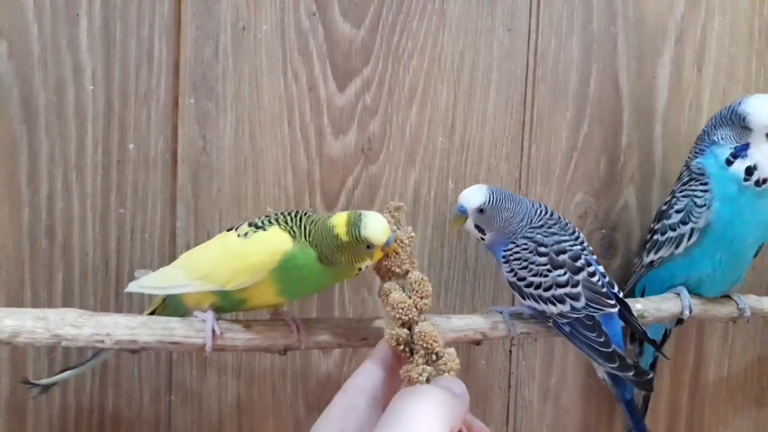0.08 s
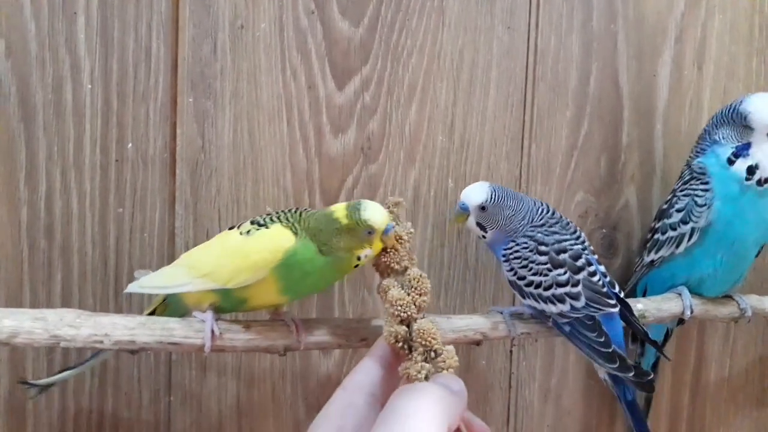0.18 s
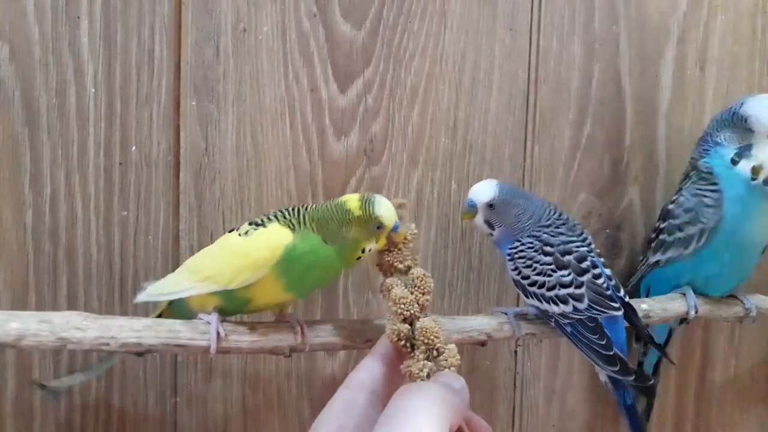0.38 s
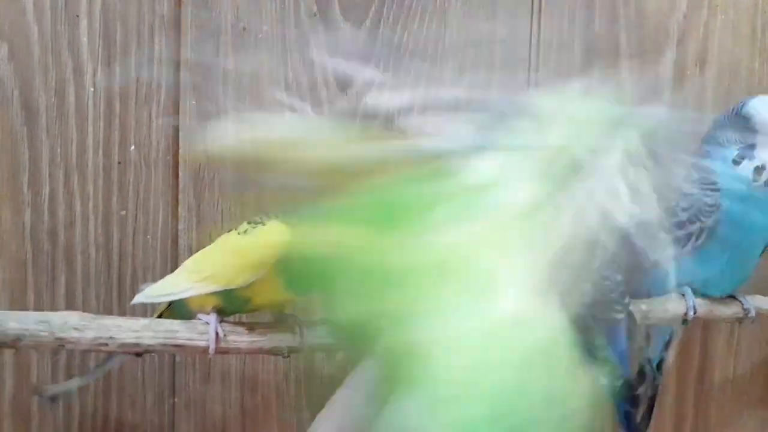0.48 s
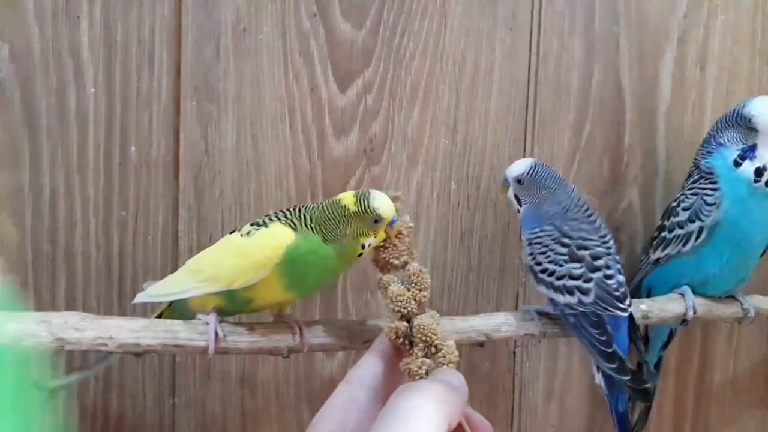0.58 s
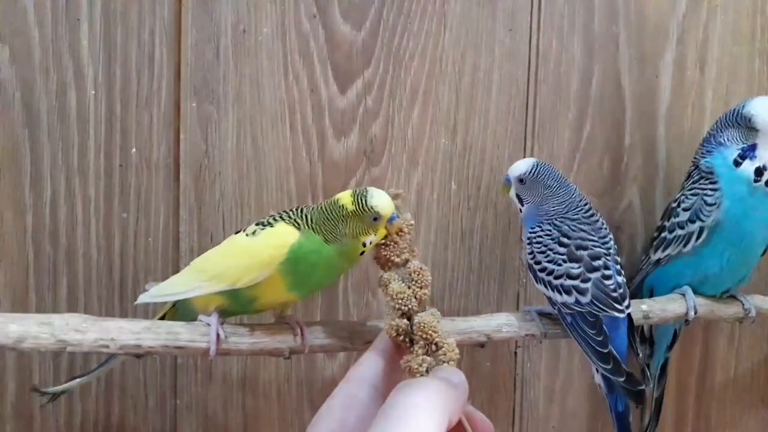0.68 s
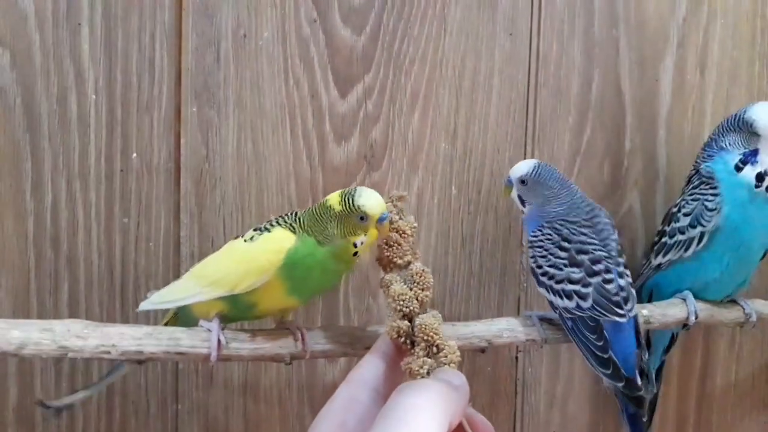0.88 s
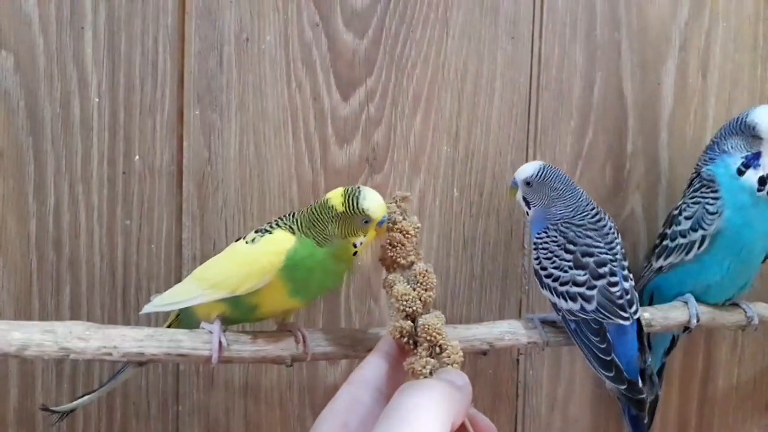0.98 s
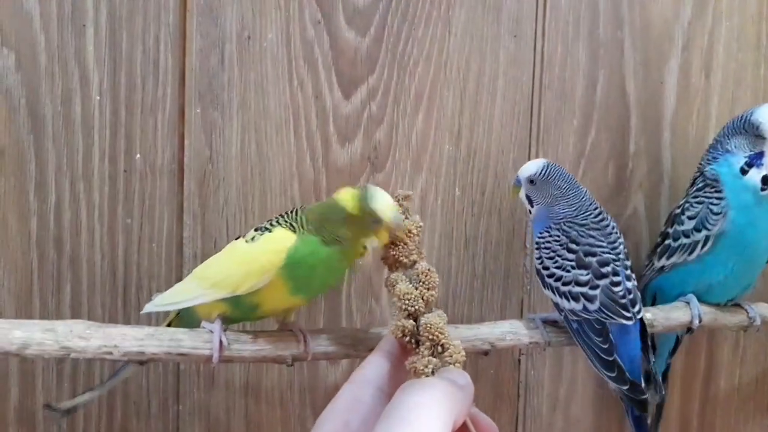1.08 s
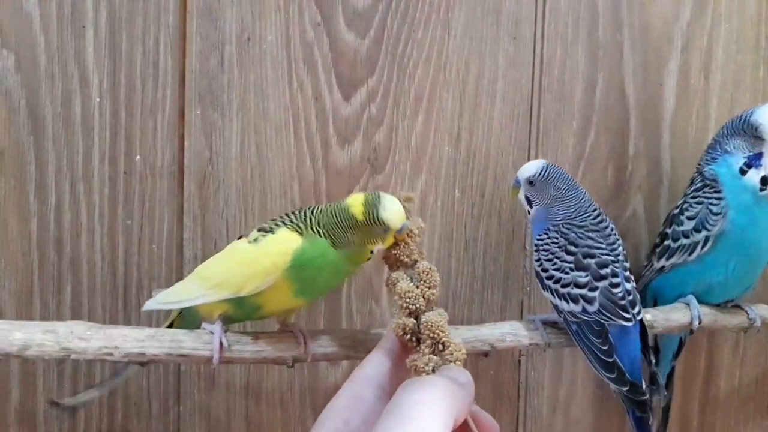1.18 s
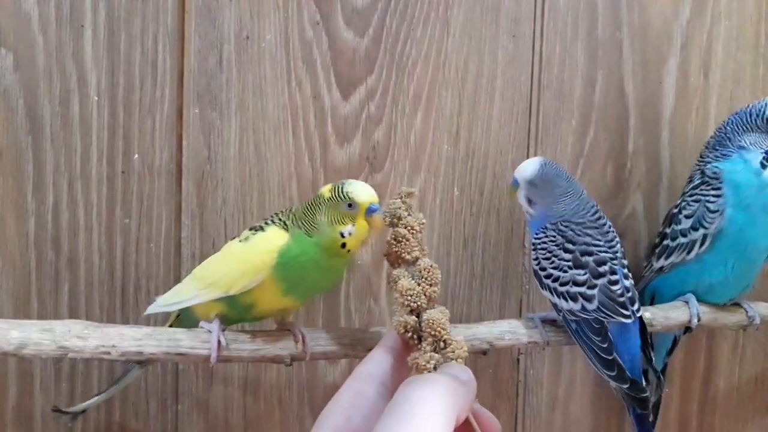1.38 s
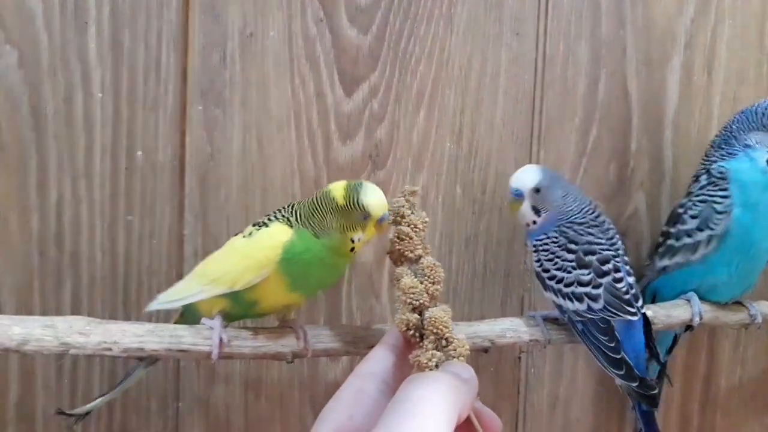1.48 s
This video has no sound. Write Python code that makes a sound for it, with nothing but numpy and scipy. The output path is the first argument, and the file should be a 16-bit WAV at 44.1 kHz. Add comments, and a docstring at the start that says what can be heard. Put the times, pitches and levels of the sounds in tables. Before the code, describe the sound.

A close budgie wing flutter dominates. Very faint seed clicks and crackle open it; from 0.17 to 0.65 seconds about ten quick feathery swishes come with snaps and low air puffs, the heaviest thump near 0.42. Bright scratchy perch scrapes peak at 0.63-0.7 and fade by 0.9. Then tiny husk cracks, soft bumps near 1.06, a dull knock at 1.23 and faint thin squeaks over quiet room air.

```python
"""Small clicks and fine crackle open the scene: budgies crack and husk millet seeds in a wood-panelled room.
Then one bird flutters near the microphone: grainy noise swishes, single-cycle air puffs and low noise.
It ends in scratchy scrapes, ringing noise strokes on the perch; low bumps and a knock follow, short
pressure swings like the puffs, while cracks and faint thin tones go on.
Feedback delays make the room; quiet coloured noise and a faint hiss lie beneath."""
import sys
import numpy as np
from scipy import signal
from scipy.fft import rfft, irfft
from scipy.io import wavfile
from scipy.ndimage import uniform_filter1d

SR = 44100
rng = np.random.default_rng(int(sys.argv[2]) if len(sys.argv) > 2 else 0)


def int16_out(signal):
    """Quantize to a 16-bit WAV file."""
    q = np.round(np.clip(np.atleast_2d(signal).T, -1, 1) * 32767)
    wavfile.write(sys.argv[1], SR, q.astype(np.int16))


N = 66150
STROKE_N = SR // 2


def amp(db):
    """Decibels to gain."""
    return 10 ** (np.asarray(db) / 20)


def rms_one(x):
    """Scale to rms 1."""
    return x / np.sqrt(np.mean(x ** 2) + 1e-20)


def noise(size=N):
    """White noise."""
    return rng.standard_normal(size)


def in_time(rows):
    """Table columns as curves, one value per sample."""
    times_s, *columns = np.transpose(rows)
    return [np.interp(np.arange(N) / SR, times_s, column) for column in columns]


def filtered(x, order, hz, kind):
    """Butterworth filter."""
    return signal.sosfilt(signal.butter(order, hz, kind, fs=SR, output="sos"), x)


def band(x, hz):
    """Band-pass, rms 1."""
    return rms_one(filtered(x, 2, hz, "band"))


def colour(x, spectrum, tilt_db=0, ring_hz=4000, ring_db=0, ring_octaves=0.12):
    """Shape by a spectrum, a tilt about 4 kHz and one broad ring; rms 1."""
    hz = np.maximum(np.fft.rfftfreq(len(x), 1 / SR), 10)
    at_hz, db = np.transpose(spectrum)
    shape_db = np.interp(np.log(hz), np.log(at_hz), db)
    shape_db -= 12 * np.maximum(np.log2(at_hz[0] / hz), 0)  # 12 dB/octave fall below the table
    shape_db += tilt_db * np.log2(hz / 4000)
    ring_offset = np.log2(hz / ring_hz) / max(ring_octaves, 0.05)
    shape_db += ring_db * np.exp(-0.5 * ring_offset ** 2)
    return rms_one(irfft(rfft(x) * amp(shape_db), len(x)))


GRIT_SPREAD_DB = 1


def grains(size, per_s):
    """Dense random contacts of uneven size and either sign."""
    sizes = amp(GRIT_SPREAD_DB * np.minimum(rng.exponential(1, size), 5))
    signs = rng.choice([-1, 1], size)
    return sizes * signs * (rng.random(size) < per_s / SR)


def add(out, s, x):
    """Mix x in at time s."""
    i = int(s * SR)
    out[i:i + len(x)] += x[:len(out) - i]


def stroke(rise_s, hold_s, t60_s):
    """Rise, hold, then an exponential release; half a second long."""
    t = np.arange(STROKE_N) / SR
    release_s = np.maximum(t - rise_s - hold_s, 0)
    return np.minimum(t / rise_s, 1) ** 2 * amp(-60 * release_s / t60_s)


PATCHY_DB, PATCHES_HZ = 1.6, (10, 50)


def patchy(x):
    """Half-octave bands swell and sink independently, keeping mean power about even."""
    hz = np.fft.rfftfreq(N, 1 / SR)
    half_octave = np.clip(2 * np.log2(np.maximum(hz, 10) / 500), 0, 11)
    whole, out = rfft(x), 0
    for k in range(12):
        share = np.clip(1 - np.abs(half_octave - k), 0, 1)
        swell_db = PATCHY_DB * band(noise(), PATCHES_HZ) - PATCHY_DB ** 2 * np.log(10) / 20
        out = out + irfft(whole * share, N) * amp(swell_db)
    return out


GRIT_PER_S = 9800  # feathers and claws
SWISH_T60_S = 0.17
# wing beats: t/s, rise/s, hold/s, level/dB, tilt/(dB/octave)
SWISHES = [(0.173, 0.022, 0.013, -42.5, 1), (0.214, 0.0071, 0.053, -39, 0),
           (0.285, 0.0032, 0.029, -44, -1.5), (0.337, 0.001, 0.018, -39.5, 0),
           (0.391, 0.0016, 0.024, -40, -0.5), (0.431, 0.0077, 0.012, -39.5, -9.5),
           (0.447, 0.0061, 0.024, -40, -2), (0.498, 0.0022, 0.03, -40, -4),
           (0.551, 0.016, 0.013, -40, -1.5), (0.617, 0.0032, 0.0078, -41.5, -2.5)]
# feather noise spectrum: f/Hz, density/dB
FEATHERS = [(410, -9), (700, -22), (757, -16), (830, -11), (2330, -8), (4050, 0), (5840, -4.5),
            (12600, -7.5), (15000, -12.5), (16000, -6.5)]


def swishes():
    """Feathers rub through each wing beat: coloured grains under a stroke envelope."""
    beats = np.zeros(N)
    for s, rise_s, hold_s, db, tilt_db in SWISHES:
        feathers = colour(grains(STROKE_N, GRIT_PER_S), FEATHERS, tilt_db)
        add(beats, s, amp(db) * stroke(rise_s, hold_s, SWISH_T60_S) * feathers)
    return patchy(beats)


PERCH_WIDTH_HZ = 57
# narrow rings of the perch: f/Hz, lift over the scrape/dB
PERCH = [(1780, 5.8), (2660, 5), (3250, 5.5), (4250, 2.9), (4650, 3.4), (6380, 6.8)]


def perch(x):
    """Perch resonances lift narrow bands; rms 1."""
    hz = np.fft.rfftfreq(len(x), 1 / SR)
    lift = sum((amp(db) - 1) / (1 + 2j * (hz - ring_hz) / PERCH_WIDTH_HZ) for ring_hz, db in PERCH)
    return rms_one(irfft(rfft(x) * (1 + lift), len(x)))


# claws and feathers on the perch: t/s, rise/s, hold/s, level/dB, tilt/(dB/octave),
# ring f/Hz, ring lift/dB, ring width/octaves (at least 0.05 is used), t60/s
SCRAPES = [(0.6318, 0.0022, 0.0061, -30.5, 2, 4400, 5.5, 0.19, 0.22),
           (0.6622, 0.0008, 0.023, -30, -0.5, 4260, 8.5, 0.18, 0.19),
           (0.736, 0.0049, 0.01, -38, -0.5, 3480, 3, 0.096, 0.086),
           (0.774, 0.0053, 0.01, -35, -1, 3760, 8, 0.049, 0.089),
           (0.786, 0.003, 0.0063, -38, -2.5, 4500, 14, 0.033, 0.075),
           (0.804, 0.003, 0.015, -36, -5.5, 1870, 4.5, 0.29, 0.16),
           (1.017, 0.014, 0.02, -61.5, -5, 2100, 10, 0.18, 0.15),
           (1.333, .004, 0.019, -60, -3.5, 5200, 17, 0.16, 0.16),
           (1.425, 0.001, 0.057, -65, -2, 780, 12.5, 0.12, 0.66)]
# scrape noise spectrum: f/Hz, density/dB
CLAWS = [(290, -75), (500, -19), (960, -11), (1740, -8.5), (3020, -5.5), (4340, -2.5), (6610, -9),
         (7420, -12.5), (15100, -8), (16000, -15)]


def scrapes():
    """Claws and feathers scrape: gritty contacts excite a broad ring and the perch."""
    out = np.zeros(N)
    for s, rise_s, hold_s, db, tilt_db, ring_hz, ring_db, ring_octaves, t60_s in SCRAPES:
        grit = colour(grains(STROKE_N, GRIT_PER_S), CLAWS, tilt_db, ring_hz, ring_db, ring_octaves)
        add(out, s, amp(db) * stroke(rise_s, hold_s, t60_s) * perch(grit))
    return out


SWING_RISE_CYCLES, SWING_SLOWING = 0.32, 0.59
# air puffs, then low bumps and a knock (last five rows): peak t/s, level/dB, f at peak/Hz, 1/e fall/cycles
PUFFS_AND_BUMPS = [(0.235, -48, 55.7, 1), (0.292, -35.5, 91, 0.97), (.347, -33, 105, 0.56),
                   (0.366, -29.5, 93, 0.96), (0.4201, -12.5, 114, 0.5), (0.4723, -17.5, 104, 1.05),
                   (0.5268, -25.5, 108, 0.43), (0.5368, -25.5, 161, 0.2), (0.581, -41, 101, 0.35),
                   (0.635, -31, 110, 0.43), (0.691, -34, 150, 0.49), (0.734, -46, 61, 0.38),
                   (1.0553, -55.5, 199, 1.8), (1.0654, -59, 201, 2.2), (1.2234, -51, 190, 0.5),
                   (1.2291, -45.5, 172, 0.84), (1.241, -54, 150, 0.79)]


def puffs_and_bumps():
    """Low pressure swings: a dip, a push, a pull and a slowing, fading swing."""
    out, t = np.zeros(N), np.arange(N) / SR
    for s, db, hz, fall_cycles in PUFFS_AND_BUMPS:
        cycles = (t - s) * hz
        after = np.maximum(cycles, 0)
        rise = np.exp(-0.5 * (cycles / SWING_RISE_CYCLES) ** 2)
        shape = np.where(cycles < 0, rise, np.exp(-after / fall_cycles))
        slowed = np.where(cycles < 0, cycles, np.log1p(SWING_SLOWING * after) / SWING_SLOWING)
        out += amp(db) * shape * np.cos(2 * np.pi * slowed)
    return out


RUMBLE_HZ, THRUM_HZ, FLUTTER_HZ = (41.5, 136.5), (137, 299), (283, 788)
LUMPY_DB, LUMPS_HZ = 1, (12, 50)
# stirred air: t/s, rumble level/dB, thrum level/dB, flutter level/dB
WASH = [(0.0, -76.5, -72, -80.5), (0.174, -75.5, -86.5, -95), (0.26, -78, -49.5, -46),
        (0.308, -65, -52.5, -47.5), (0.376, -53, -54, -54.5), (0.396, -45, -40, -48),
        (0.43, -62, -49.5, -52), (0.45, -30, -56, -42.5), (0.49, -57, -38.5, -67), (0.506, -36, -61, -39),
        (0.552, -51.5, -46, -58), (0.587, -37, -51, -40), (0.599, -45, -56, -56.5),
        (0.63, -59.5, -60, -52.5), (0.688, -50, -48.5, -52.5), (0.756, -66, -66.5, -57.5),
        (0.818, -66, -54.5, -53), (0.972, -76.5, -64.5, -66.5), (1.04, -76, -69.5, -73.5),
        (1.202, -76, -79, -91), (1.22, -77, -76.5, -70), (1.298, -79, -81, -93), (1.408, -76, -81, -103),
        (1.441, -84, -70, -68), (1.5, -68, -73, -73.5)]


def wash():
    """Stirred air and the shaken perch: three low noise bands under one lumpy gain."""
    lumps = amp(LUMPY_DB * band(noise(), LUMPS_HZ))
    out = np.zeros(N)
    for db, hz in zip(in_time(WASH), (RUMBLE_HZ, THRUM_HZ, FLUTTER_HZ)):
        out += amp(db) * band(band(noise(), hz), hz)  # twice for steeper edges
    return lumps * out


CRACK_RING_DB, CREST_DB = 9.5, 13  # crest: nominal peak over rms
TICK_DB, TICK_T60_S = -4, 0.003  # sharp start of a crack
# seeds cracking, quills snapping: t/s, nominal peak level/dB, ring f/Hz, t60/s, tilt/(dB/octave)
CRACKS = [ (0.0207, -37, 7200, 0.065, 9.5), (.0987, -39, 2620, 0.1, -6.5), (.218, -22.5, 6700, 0.031, 2),
          (0.3711, -20.5, 12600, 0.0091, -1.5), (.396, -20.5, 9340, 0.035, 6), (.405, -20, 4360, 0.05, 1.5),
          (0.451, -18, 6400, 0.053, 2), (.466, -19, 3870, 0.034, -1), (.509, -19.5, 4050, 0.042, 0.5),
          (0.5838, -21.5, 3620, 0.031, -12), (0.633, -20, 4570, 0.024, 3), (0.6625, -13, 6320, 0.1, -4.5),
          (0.9086, -33, 10200, 0.028, 17), (0.9449, -28, 8200, 0.007, 1), (0.9451, -38.5, 10600, 0.046, 0),
          (0.9574, -42.5, 9000, 0.028, -3), (1.0235, -41.5, 8140, 0.041, 4.5),
          (1.0994, -35.5, 7150, 0.036, -1.5), (1.1657, -39.5, 9500, 0.04, 3.5),
          (1.1868, -41, 9000, 0.23, 9.5), (1.3043, -40, 13000, 0.032, 1.5), (1.3337, -34.5, 6740, 0.063, 2),
          (1.3415, -41, 7100, 0.061, 3), (1.3712, -36.5, 13200, 0.049, 1.5),
          (1.4221, -34.5, 9600, 0.055, 3), (1.486, -42, 8560, 0.025, -6.5)]
# husk noise spectrum, for cracks and crackle: f/Hz, density/dB
HUSK = [(410, -90), (700, -23), (1460, -25), (1730, -10.5), (2300, 0), (3240, -2.5), (3690, 10),
        (12800, 5.5), (16000, 5)]


def cracks():
    """Brittle husks and quills snap: a very short tick plus a ringing noise decay."""
    out = np.zeros(N)
    tick = amp(TICK_DB) * stroke(0.00015, 0, TICK_T60_S)
    for s, db, ring_hz, t60_s, tilt_db in CRACKS:
        envelope = stroke(0.00035, 0, t60_s) + tick
        burst = colour(noise(STROKE_N), HUSK, tilt_db, ring_hz, CRACK_RING_DB)
        add(out, s, amp(db - CREST_DB) * envelope * burst)
    return out


CRACKLE_PER_S, RUSTLE_HZ = 7700, (615, 3170)
# beaks on husks, one level curve running through the whole scene: t/s, crackle level/dB, rustle level/dB
NIBBLE = [
    [(0.0, -64, -79), (0.022, -55, -76), (0.038, -64, -73), (0.042, -55.5, -78), (0.092, -63, -84),
     (0.1, -62, -94), (0.112, -75, -90), (0.15, -62, -88), (0.168, -72, -87), (0.17, -60.5, -81)],
    [(0.96, -65.5, -69), (0.972, -113, -78), (1.114, -61.5, -66.5), (1.154, -72, -105), (1.168, -62.5, -79),
     (1.286, -68, -88), (1.372, -59.5, -74.5), (1.396, -69, -99), (1.432, -73, -63.5), (1.5, -77, -90)],
]


def nibble():
    """Beaks work the husks: grainy crackle over a duller noise rustle."""
    crackle_db, rustle_db = in_time(NIBBLE[0] + NIBBLE[1])
    crackle = colour(grains(N, CRACKLE_PER_S), HUSK)
    rustle = band(noise(), RUSTLE_HZ)
    return amp(crackle_db) * crackle + amp(rustle_db) * rustle


SQUEAK_STEADY = 1.5  # steady part over rms wavering
# faint narrow rings and one thin band: t/s, length/s, f/Hz, width/Hz, level/dB
SQUEAKS = [(0.0, 0.2, 2500, 500, -74), (1.105, 0.03, 9800, 500, -62), (1.224, 0.017, 4030, 400, -65),
           (1.34, 0.04, 3270, 70, -63), (1.372, 0.038, 3310, 60, -69), (1.356, 0.045, 4180, 160, -69),
           (1.348, 0.025, 2140, 120, -73), (1.421, 0.068, 1750, 70, -66), (1.424, 0.06, 950, 80, -71)]


def squeaks():
    """Thin tones wavering by smoothed noise in two phases; quick start, then a fade."""
    out = np.zeros(N)
    for s, length_s, hz, width_hz, db in SQUEAKS:
        t = np.arange(int(length_s * SR)) / SR
        smooth_n = int(SR / width_hz)
        a, b = [rms_one(uniform_filter1d(v, smooth_n))[:len(t)] for v in noise((2, SR // 4))]
        phase = 2 * np.pi * hz * t
        tone = (SQUEAK_STEADY + a) * np.sin(phase) + b * np.cos(phase)
        swell = np.sin(np.pi * (t / length_s) ** 0.5) ** 0.5
        add(out, s, amp(db) * swell * rms_one(tone))
    return out


ROOM_T60_S, WALL_CUT_HZ, ROOM_DB = 0.38, 6000, -16.5  # T60 at low f


def room(x):
    """Wall echoes: ten parallel feedback delays, duller on every round."""
    out, dull = np.zeros(N), np.exp(-2 * np.pi * WALL_CUT_HZ / SR)
    lags = (rng.uniform(0.011, 0.033, 10) * SR).astype(int)
    for k, lag in enumerate(lags):
        loop, state = x.copy(), [0.0]
        gain = amp(-60 * lag / SR / ROOM_T60_S)
        for i in range(lag, N, lag):
            back, state = signal.lfilter([gain * (1 - dull)], [1, -dull], loop[i - lag:i], zi=state)
            loop[i:i + lag] += back[:N - i]
        out += (loop - x) * (-1) ** k
    return out


AIR_DB = -70
# quiet room spectrum: f/Hz, density/dB
AIR = [(180, -52), (300, 4.5), (1120, -27.5), (1640, -12.5), (2030, -26), (2520, -9.5), (4230, -8),
       (12300, -10), (16000, -9)]


def air():
    """Quiet room: steady coloured noise."""
    return amp(AIR_DB) * colour(noise(), AIR)


def scene():
    """Birds close by with room echoes; puffs, bumps, wash and room noise stay dry."""
    birds = swishes() + scrapes() + cracks() + nibble() + squeaks()
    mid = birds + amp(ROOM_DB) * room(birds) + puffs_and_bumps() + wash() + air()
    return np.array([mid, mid])


MIC_LOW_HZ, MIC_TOP_HZ = 50, 16250  # top: stopband edge
SIDE_DB, SIDE_HZ = -85, 1520


def record(dry):
    """Almost mono: opposite-sign faint hiss in the two sides; lowest bass and top are cut."""
    dry = filtered(dry, 2, MIC_LOW_HZ, "high")
    hiss = rms_one(filtered(noise(), 1, SIDE_HZ, "high"))
    wide = dry + amp(SIDE_DB) * hiss * [[1], [-1]]
    return signal.sosfilt(signal.cheby2(14, 70, MIC_TOP_HZ, fs=SR, output="sos"), wide)


dry = scene()
out = record(dry)
int16_out(out)
```